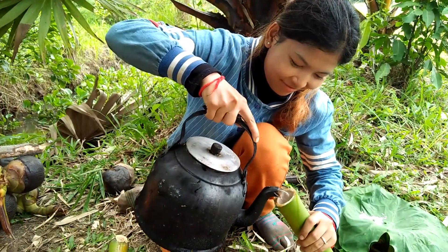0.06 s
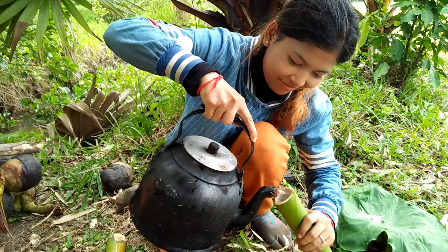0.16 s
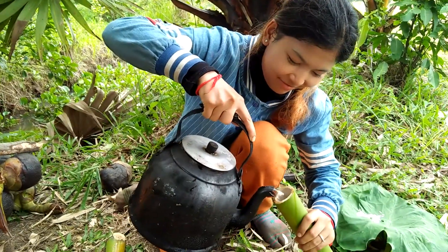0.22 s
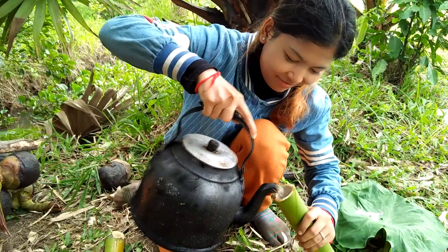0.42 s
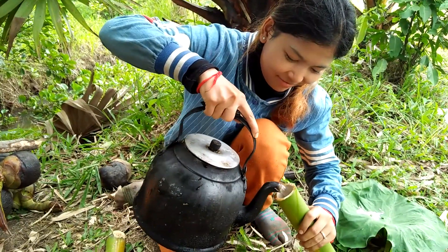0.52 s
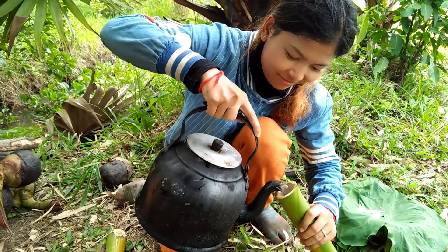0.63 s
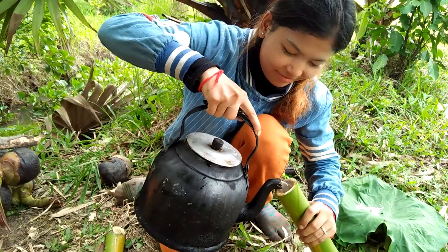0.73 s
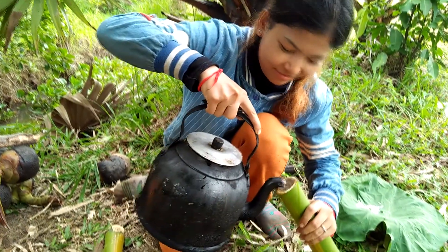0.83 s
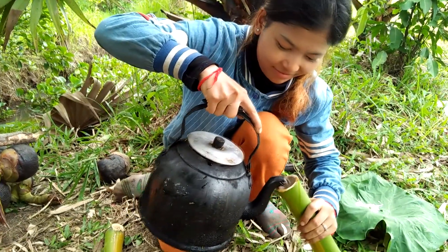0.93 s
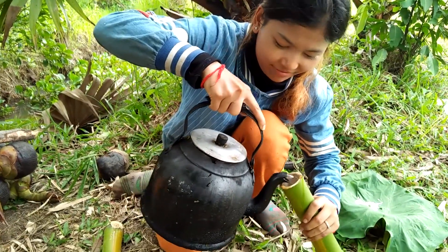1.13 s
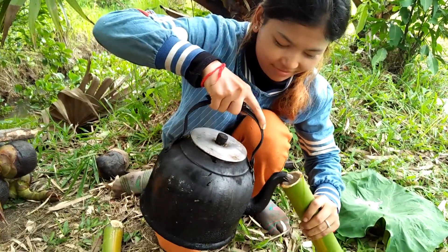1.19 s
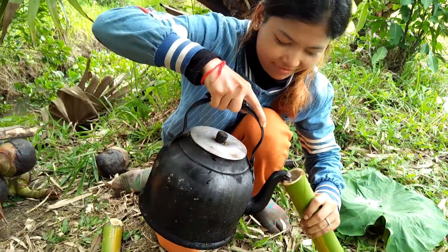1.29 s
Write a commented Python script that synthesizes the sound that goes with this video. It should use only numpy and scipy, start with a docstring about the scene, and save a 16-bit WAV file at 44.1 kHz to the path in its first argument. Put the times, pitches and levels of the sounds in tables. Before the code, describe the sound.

Water poured from a metal kettle into a bamboo cup, a brief gurgle after sharp clicks outdoors

```python
"""A fading click and a brief hiss come first, then a thump and a sharp click: water is poured outdoors
from a metal kettle into a bamboo cup. A short gush gurgles and thins to drips, among lighter clicks.
A bird whistles upward, an insect shrills and a soft high hiss swells and sinks. Contacts and the cup
are decaying or driven resonances, bubbles are gliding damped sines, hiss and churn are shaped noise."""
import sys
import numpy as np
from scipy import signal
from scipy.fft import rfft, irfft
from scipy.io import wavfile
from scipy.ndimage import uniform_filter1d

SR = 44100
rng = np.random.default_rng(int(sys.argv[2]) if len(sys.argv) > 2 else 0)


def master_out(mix):
    """Clip the mix to full scale and print it as 16-bit PCM to the path in sys.argv[1]."""
    frames = np.transpose(np.atleast_2d(mix))
    ceiling = np.clip(frames, -1, 1)
    pcm = np.round(ceiling * 32767).astype(np.int16)
    wavfile.write(sys.argv[1], SR, pcm)


N = 59535
T = np.arange(N) / SR  # time [s]


def amp(db):
    """Level law: decibels to amplitude gain."""
    return 10 ** (np.asarray(db) / 20)


def unit(x):
    """Normalisation to an rms of 1."""
    return x / np.sqrt(np.mean(x ** 2))


def curve(points):
    """Envelope: gain over time, linear in dB between (time [s], level [dB]) points."""
    return amp(np.interp(T, *np.array(points).T))


def fade(age, t60):
    """Exponential decay from age 0, falling 60 dB in t60 seconds."""
    return (age >= 0) * np.exp(-np.log(1000) * np.maximum(age, 0) / t60)


def colour(x, spectrum):
    """Spectral shaping by (frequency [Hz], gain [dB]) points on a log-frequency axis; rms 1."""
    hz, db = np.array(spectrum).T
    f = np.maximum(np.fft.rfftfreq(N, 1 / SR), 1)
    gain = amp(np.interp(np.log(f), np.log(hz), db))
    return unit(irfft(rfft(x) * gain, N))


def noise(spectrum):
    """Coloured Gaussian noise, rms 1."""
    return colour(rng.standard_normal(N), spectrum)


def resonate(x, hz, width_hz):
    """Single second-order resonance with gain 1 at its centre."""
    return signal.lfilter(*signal.iirpeak(hz, hz / width_hz, fs=SR), x)


def narrow_band(x, hz, width_hz):
    """Two equal resonances in series, each width_hz wide; rms 1."""
    return unit(resonate(resonate(x, hz, width_hz), hz, width_hz))


def smear(x, t60):
    """Diffuse reflection: convolution with exponentially decaying noise of unit energy."""
    echoes = rng.standard_normal(N) * fade(T, t60)
    return signal.fftconvolve(x, echoes / np.linalg.norm(echoes))[:N]


def add(out, start, sound):
    """Superposition of a sound from its start time [s]."""
    i = int(np.clip(start * SR, 0, N))
    out[i:i + len(sound)] += sound[:N - i]


def bubble(hz, rise, swell, t60):
    """Bubble oscillation: a damped sine whose pitch glides, then settles as it reaches the surface."""
    age = T[:int((swell + t60) * SR)]
    glide_s = 1.2 * swell
    onset = np.sin(np.pi / 2 * np.minimum(age / swell, 1)) ** 2
    shape = onset * fade(np.maximum(age - swell, 0), t60)
    octaves = rise * glide_s * np.tanh(age / glide_s)  # rise is the initial slope [octaves/s]
    return shape * np.sin(2 * np.pi * np.cumsum(hz * 2 ** octaves) / SR)


def tube(x):
    """Cavity resonance: the hollow of the bamboo sums parallel resonances; rms 1."""
    # resonances of the hollow: (frequency [Hz], width [Hz], level [dB])
    hollow_modes = [(924, 52, -0.5), (1218, 40, -2), (1327, 250, 1.5), (1727, 62, -3.5), (1925, 57, -4.5),
                    (2490, 85, -10), (2820, 33, -12.5)]
    return unit(sum(amp(db) * resonate(x, hz, width) for hz, width, db in hollow_modes))


def clicks():
    """Impact excitation: hard contacts ring in damped modes and leave a wash whose treble lasts longest."""
    # contacts; the first is already dying away:
    # (time [s], level [dB], extra level of the low modes [dB], extra level of the tail [dB])
    contacts = [(-.02, -20.5, -3.5, -3.5), (0.2521, 0, 2.5, -1.5), (0.6104, -20.5, 4, -9),
                (0.6244, -33.5, -20, -29), (1.145, -44.5, -24, -0.5)]
    # ringing modes: (frequency [Hz], level [dB], t60 [s])
    modes = [(949.4, -4.5, 0.0024), (1843, -9, 0.0049), (2500, -12, 0.0055), (3430, -22.5, 0.011),
             (7200, -18.5, 0.018), (8290, 0, 0.0047), (8770, 2.5, 0.0033), (9410, 3.5, 0.0047),
             (10060, -12, 0.012), (12210, -6, 0.0073), (13330, -12, 0.0062)]
    # spectrum of the wash: (frequency [Hz], relative level [dB])
    wash_spectrum = [(500, -23), (1200, -9.5), (2400, -7.5), (4000, -4), (6300, 0.5), (9000, 5),
                     (14500, -1.5)]
    ring_db, tail_db, late_db = -5, -25, -28
    attack_s, hold_s = 0.00026, 0.015  # rise time constant; delay before the wash decays
    low_t60_s, high_t60_s, late_t60_s = 0.088, 0.14, 0.32
    split_hz = 6200  # divides low from high, for modes and wash alike

    out, wash = np.zeros(N), noise(wash_spectrum)
    low = signal.sosfiltfilt(signal.butter(2, split_hz, fs=SR, output="sos"), wash)
    for start, db, extra_low_db, extra_tail_db in contacts:
        age = np.maximum(T - start, 0)
        attack = 1 - np.exp(-age / attack_s)
        ring = np.zeros(N)
        for hz, mode_db, t60 in modes:
            gain = amp(mode_db + extra_low_db * (hz < split_hz))
            ring += gain * fade(age, t60) * np.sin(2 * np.pi * hz * age)
        late = np.maximum(age - hold_s, 0)
        tail = low * fade(late, low_t60_s) + (wash - low) * fade(late, high_t60_s)
        tail += amp(late_db) * wash * fade(late, late_t60_s)
        out += amp(db) * attack * (amp(ring_db) * ring + amp(tail_db + extra_tail_db) * tail)
    return out


def garden():
    """Filtered noise: an insect's narrow shrill, a high hiss that swells and sinks, and still air."""
    # insect envelope: (time [s], level [dB])
    insect_level = [(.12, -78), (.2, -100), (.33, -65), (.48, -75.5), (.7, -82)]
    # hiss envelope: (time [s], level [dB])
    hiss_level = [(0, -43), (.11, -77.5), (.2, -96.5), (.36, -63.5), (.495, -77.5), (.522, -60.5),
                  (.6, -58), (.67, -65.5), (.78, -63), (.9, -62.5), (1.1, -76.5), (1.33, -80)]
    # hiss spectrum: (frequency [Hz], relative level [dB])
    hiss_spectrum = [(2000, -25.5), (4500, -23), (6500, -8), (8800, 3), (11000, -3), (14500, -2.5)]
    # still-air spectrum: (frequency [Hz], relative level [dB])
    air_spectrum = [(25, -1.5), (85, 3.5), (250, -14), (900, -12.5), (1900, -17), (3500, -27)]
    air_db = -74.5
    shrill = narrow_band(rng.standard_normal(N), hz=5340, width_hz=250)
    hiss = curve(hiss_level) * noise(hiss_spectrum)
    return curve(insect_level) * shrill + hiss + amp(air_db) * noise(air_spectrum)


def stream():
    """Random impulses: droplets ring the tube and spray, bubbles fizz, and the water churns low beneath."""
    # strength of the stream: (time [s], level [dB])
    flow = [(.24, -83.5), (.33, -62.5), (.43, -79.5), (.505, -76), (.523, -47), (.555, -55.5), (.62, -56.5),
            (.655, -70.5), (.688, -58), (.74, -69.5), (1.1, -81.5)]
    # spray spectrum: (frequency [Hz], relative level [dB])
    spray_spectrum = [(300, -17), (700, -0.5), (1500, -2), (3000, -9), (4500, -10), (7000, 16),
                      (14000, 1.5)]
    # envelope of the low gurgle: (time [s], level [dB])
    gurgle_level = [(.03, -64.5), (.12, -78.5), (.186, -63.5), (.33, -68), (.495, -76), (.59, -51.5),
                    (.68, -61), (.85, -65), (1.06, -70), (1.14, -67.5), (1.23, -84)]
    # gurgle spectrum: (frequency [Hz], relative level [dB])
    gurgle_spectrum = [(25, -8.5), (70, 9), (235, -11), (305, -3), (370, -19), (700, -15.5), (1500, -50.5)]
    drops_per_s, drop_spread_db = 1100, 2  # mean rate; standard deviation of level
    spray_db, spray_t60_s = -11.5, 0.02
    fizz_count, fizz_low_hz, fizz_high_hz, fizz_db = 200, 898, 2850, -4.5
    fizz_rise, fizz_swell_cycles, fizz_t60_cycles = 6.6, 2, 28  # rise in octaves/s

    hits = (rng.random(N) < drops_per_s / SR) * rng.choice([-1, 1], N)
    drops = hits * amp(drop_spread_db * rng.standard_normal(N))
    fizz = np.zeros(N)
    for when, size, strength in rng.random((fizz_count, 3)):
        hz = fizz_low_hz * (fizz_high_hz / fizz_low_hz) ** size
        ring = bubble(hz, fizz_rise, fizz_swell_cycles / hz, fizz_t60_cycles / hz)
        add(fizz, when * N / SR, strength * ring)
    spray = colour(smear(drops, spray_t60_s), spray_spectrum)
    splash = tube(drops) + amp(spray_db) * spray + amp(fizz_db) * unit(fizz)
    return curve(flow) * splash + curve(gurgle_level) * noise(gurgle_spectrum)


def drips():
    """Damped resonance: bubbles plink, drops slap and ring the cup, a light tick ends; all echo briefly."""
    # single bubbles, and the low part of the tick at 1.063 s:
    # (time [s], level [dB], starting pitch [Hz], initial rise [octaves/s], t60 [s])
    plinks = [(0.134, -56.5, 1970, -26, 0.012), (0.284, -54.5, 1267, 7, 0.033),
              (0.447, -53, 854, 6.5, 0.027), (0.453, -43.5, 1033, 16.5, 0.033),
              (.472, -53.5, 1300, 24, 0.014), (0.503, -49, 113, 47, 0.065), (0.557, -53, 208.4, -2, 0.082),
              (.5797, -37.5, 1440, -62, 0.016), (.619, -33, 594, 49, 0.003),
              (.685, -55.5, 3180, 7.5, 0.025), (.98, -55.5, 1784, 4, 0.013), (1.063, -62, 1795, 0, 0.016),
              (1.11, -50.5, 554, 37.5, 0.061), (1.212, -66.5, 725, 6, 0.05)]
    # drops slapping the bamboo, and at the end a light tick:
    # (time [s], level [dB], centre [Hz], width of each resonance [Hz])
    slaps_and_tick = [(0.4514, -64.5, 2470, 347), (0.5195, -43, 2230, 970), (0.625, -47, 1150, 400),
                      (0.673, -53, 1600, 1110), (.686, -50.5, 2090, 780), (0.717, -56.5, 1070, 700),
                      (0.8975, -50.5, 2700, 630), (1.064, -60.5, 3320, 1730)]
    swell_share = 0.28  # swell time as a share of t60
    slap_t60_s, slap_ring_db = 0.039, -8.5
    echo_db, echo_t60_s = -6.5, 0.047

    out = np.zeros(N)
    for start, db, hz, rise, t60 in plinks:
        add(out, start, amp(db) * bubble(hz, rise, swell_share * t60, t60))
    wet = rng.standard_normal(N) + amp(slap_ring_db) * tube(rng.standard_normal(N))
    for start, db, hz, width in slaps_and_tick:
        out += amp(db) * fade(T - start, slap_t60_s) * narrow_band(wet, hz, width)
    return out + amp(echo_db) * smear(out, echo_t60_s)


def knock():
    """Impulse and response: a dull push with a low ring that sags to its pitch, before the loudest click."""
    start_s, level_db, final_hz, t60_s = 0.2454, -23.5, 53, 0.096
    sag, sag_s = 0.82, 0.0082  # initial excess as a share of the final pitch; its time constant
    push_s = 0.00066
    out = np.zeros(N)
    phase = np.cumsum(final_hz * (1 + sag * np.exp(-T / sag_s))) / SR
    push = 2 * amp(-4.5) * np.exp(-(T / push_s - 2) ** 2)
    onset = np.tanh(T / push_s / 2) ** 2
    ring = onset * np.sin(2 * np.pi * phase) * fade(T, t60_s)
    add(out, start_s, amp(level_db) * (ring - push))
    return out


def bird():
    """Frequency modulation: rising whistles and a high note, hoarser when higher, smeared by the trees."""
    # whistle contour: (time after its start [s], pitch [Hz], relative level [dB])
    contour = [(0, 3544, -20), (.04, 4084, -11), (.054, 4630, -2.5), (0.091, 5240, 3.5), (.122, 5530, -15),
               (.153, 6500, 2), (0.167, 7000, 0.5), (.19, 7100, -25)]
    # whistles: (time [s], level [dB])
    whistles = [(0.386, -65.5), (0.81, -63)]
    # short high notes: (time [s], starting pitch [Hz], level [dB])
    chips = [(1.158, 6320, -62)]
    chip_s, chip_rise_hz = 0.034, 647
    waver_share, waver_growth = 0.0617, 3.3  # rms pitch share at the top of the whistle; power of pitch
    trees_t60_s, trees_db = 0.16, 1

    out = np.zeros(N)
    times, pitch, level = np.array(contour).T
    waver = waver_share * unit(uniform_filter1d(rng.standard_normal(N), size=30))

    def voice(hz):
        """Phase integration of a pitch that wavers more as it rises."""
        wavering_hz = hz * (1 + waver * (hz / pitch.max()) ** waver_growth)
        return np.sin(2 * np.pi * np.cumsum(wavering_hz) / SR)

    for start, db in whistles:
        age = T - start
        sounding = (age > 0) * (age < times[-1])
        gain = amp(db + np.interp(age, times, level))
        out += sounding * gain * voice(np.interp(age, times, pitch))
    for start, hz, db in chips:
        part = np.clip((T - start) / chip_s, 0, 1)
        out += amp(db) * np.sin(np.pi * part) * voice(hz + chip_rise_hz * part)
    return out + amp(trees_db) * smear(out, trees_t60_s)


def glugs():
    """Large-bubble oscillation: gulps of air swell one after another, each falling in pitch."""
    # gulps: (time [s], level [dB], starting pitch [Hz], t60 [s])
    gulps = [(0.612, -37.5, 154, 0.04), (.638, -50, 116, 0.059), (0.674, -49.5, 119.5, 0.19),
             (0.713, -45.5, 123, 0.075), (0.78, -47, 150, 0.067), (.886, -50.5, 192, 0.085),
             (.993, -54.5, 177, 0.077)]
    swell_s, fall = 0.00917, 76  # fall is the initial slope [octaves/s]
    out = np.zeros(N)
    for start, db, hz, t60 in gulps:
        add(out, start, amp(db) * bubble(hz, -fall, swell_s, t60))
    return out


def scene():
    """Linear superposition of all sources at one microphone."""
    return (clicks() + garden() + stream() + drips() + knock() + bird() + glugs())[None]


def record(dry):
    """Low-pass filtering: the recorder cuts the top steeply."""
    top_hz, ripple_db, stop_db = 14250, 0.2, 60
    return signal.sosfilt(signal.ellip(8, ripple_db, stop_db, top_hz, fs=SR, output="sos"), dry)


dry = scene()
out = record(dry)
master_out(out)
```